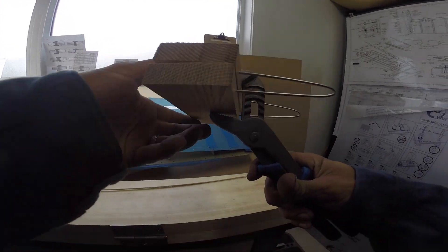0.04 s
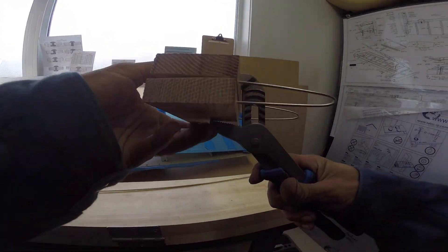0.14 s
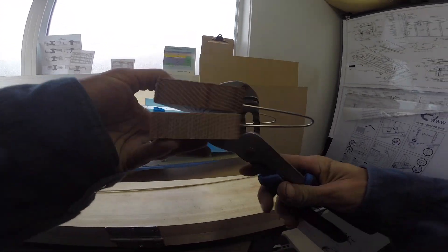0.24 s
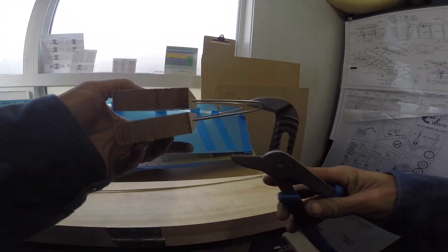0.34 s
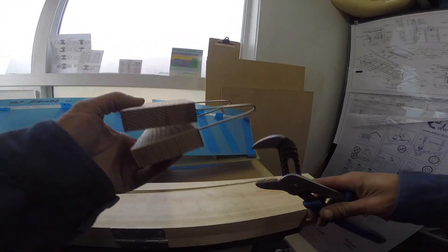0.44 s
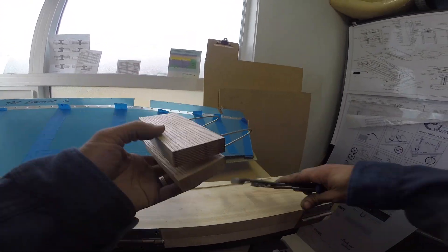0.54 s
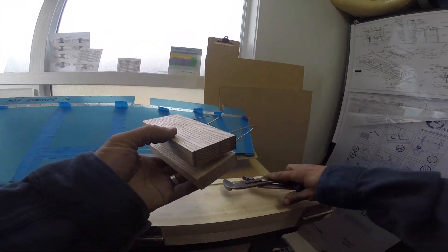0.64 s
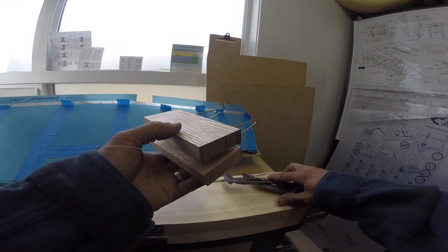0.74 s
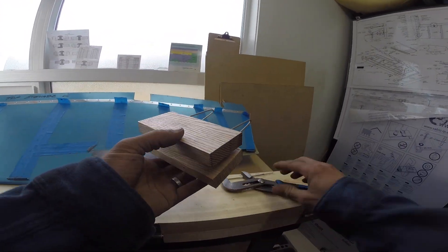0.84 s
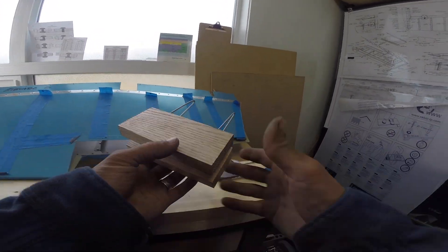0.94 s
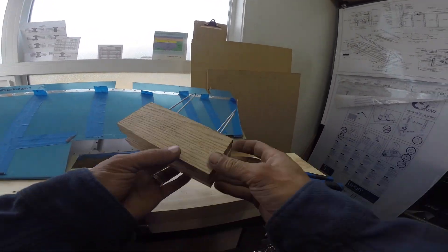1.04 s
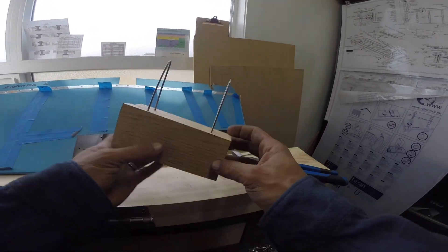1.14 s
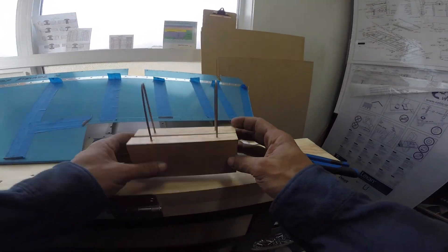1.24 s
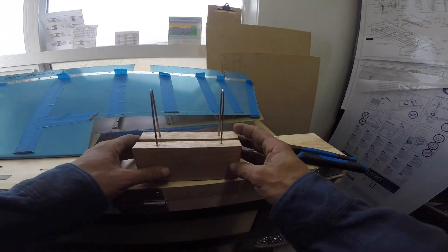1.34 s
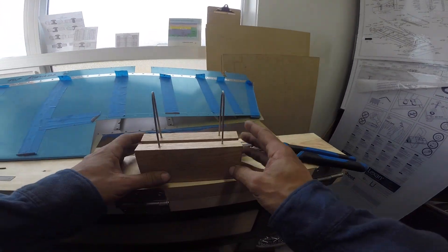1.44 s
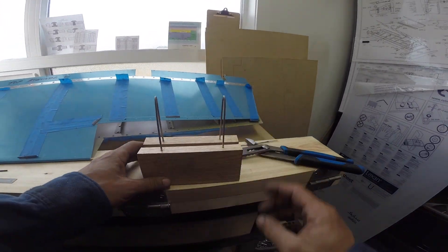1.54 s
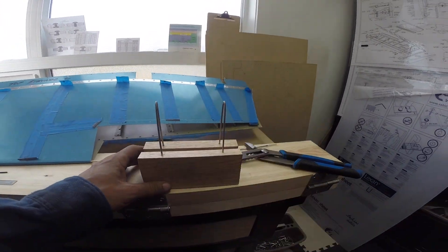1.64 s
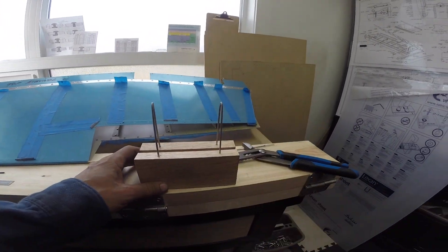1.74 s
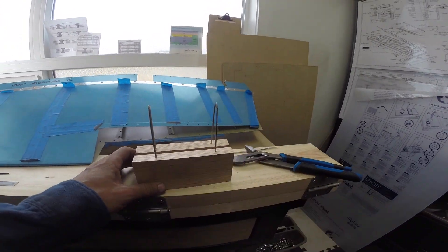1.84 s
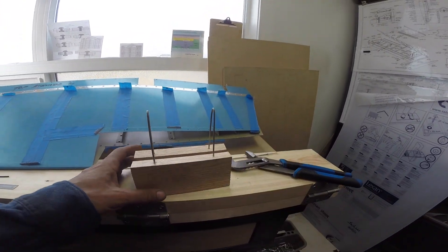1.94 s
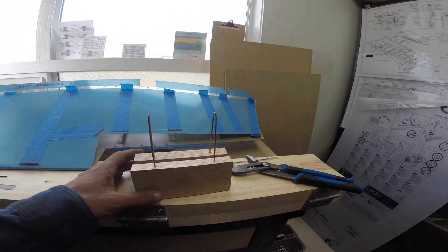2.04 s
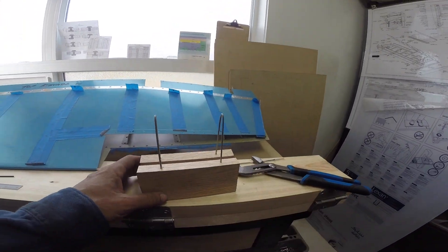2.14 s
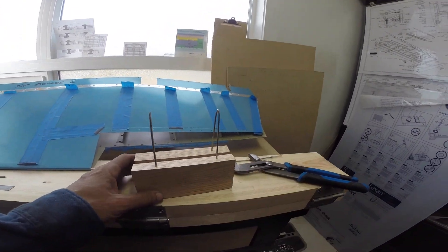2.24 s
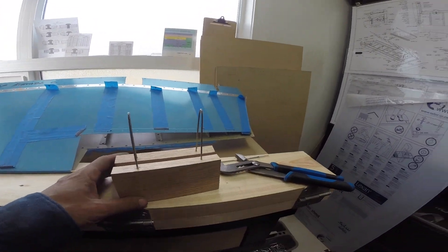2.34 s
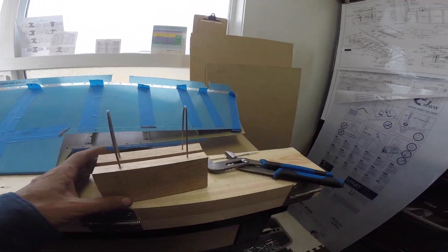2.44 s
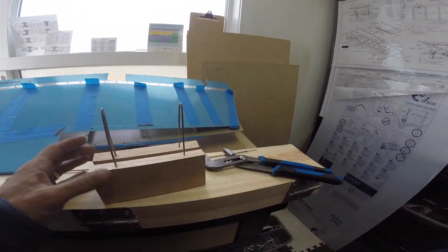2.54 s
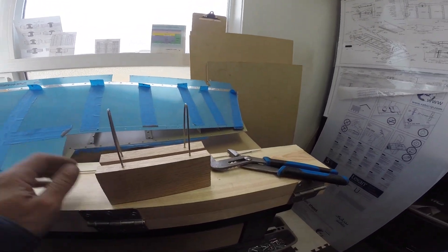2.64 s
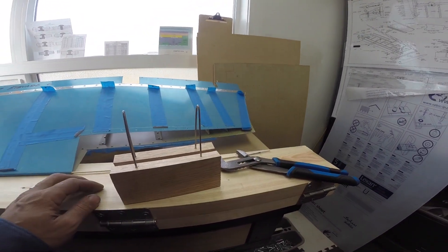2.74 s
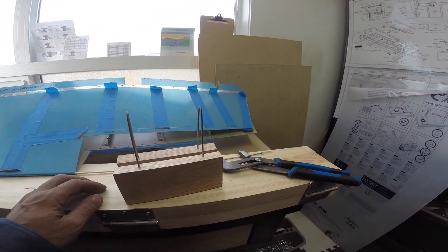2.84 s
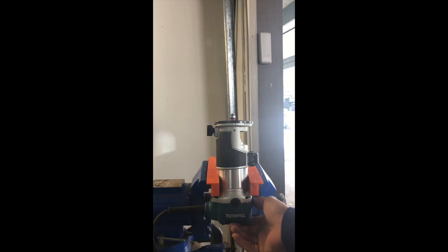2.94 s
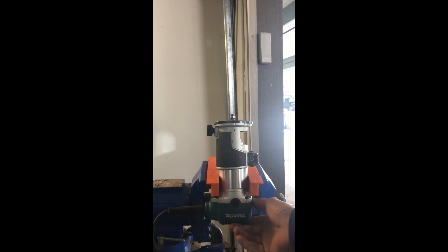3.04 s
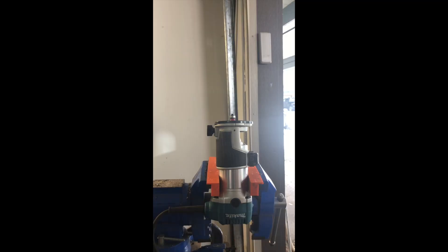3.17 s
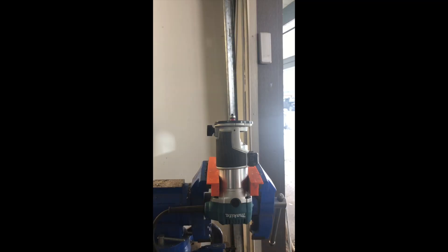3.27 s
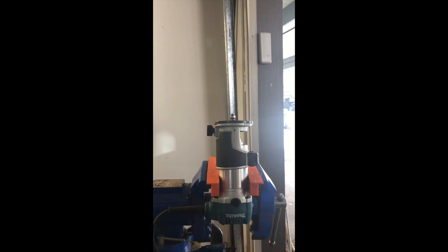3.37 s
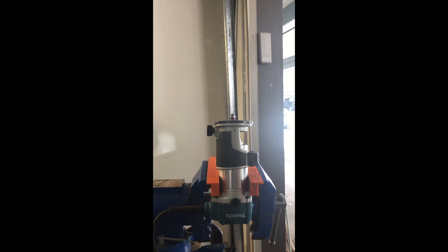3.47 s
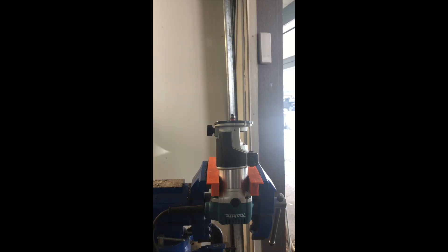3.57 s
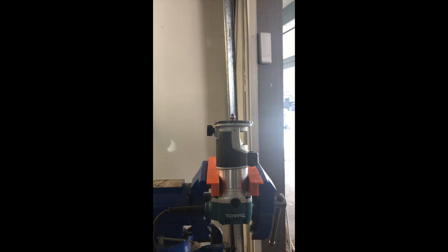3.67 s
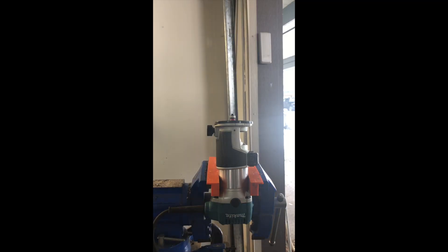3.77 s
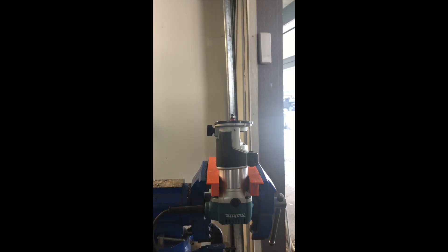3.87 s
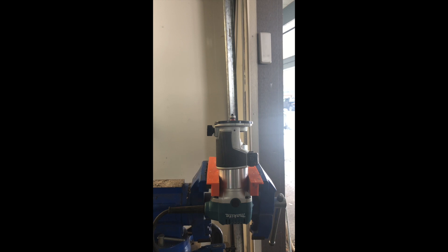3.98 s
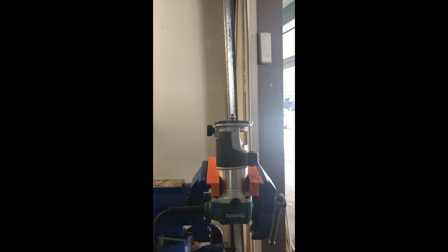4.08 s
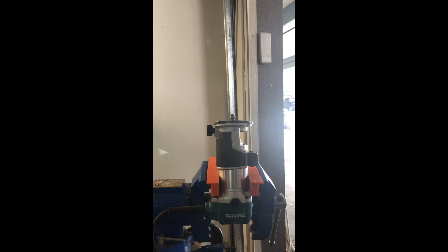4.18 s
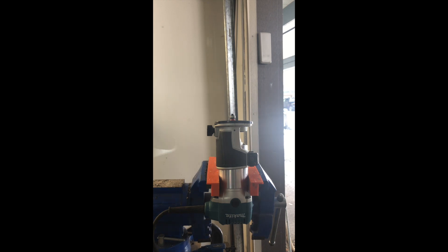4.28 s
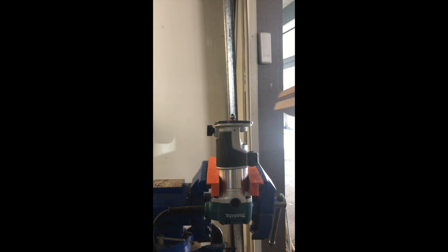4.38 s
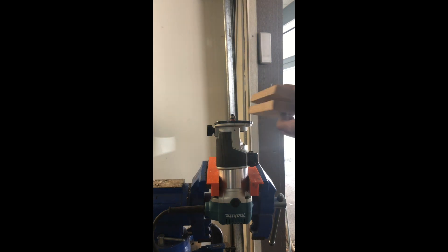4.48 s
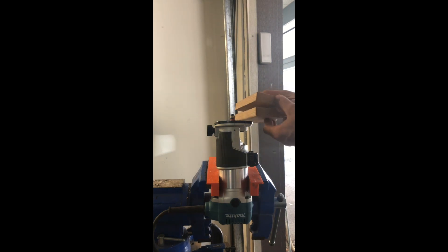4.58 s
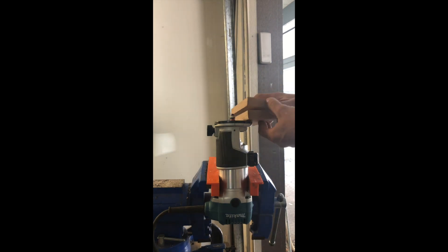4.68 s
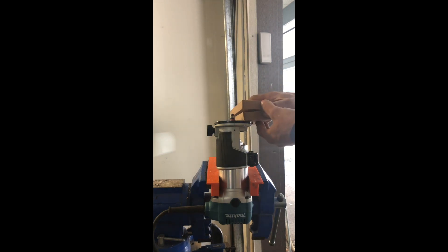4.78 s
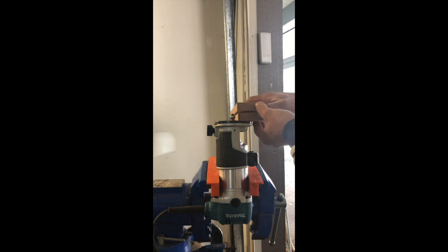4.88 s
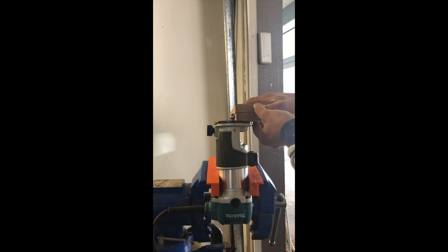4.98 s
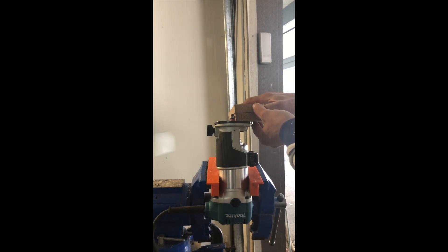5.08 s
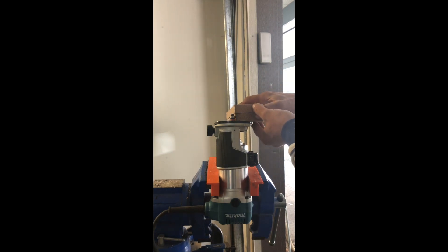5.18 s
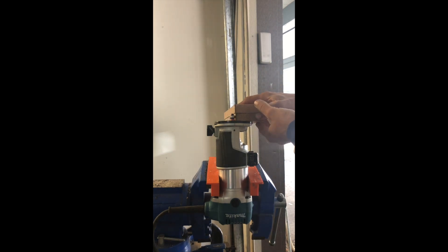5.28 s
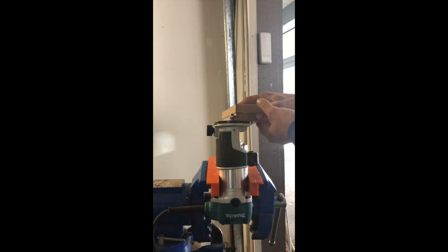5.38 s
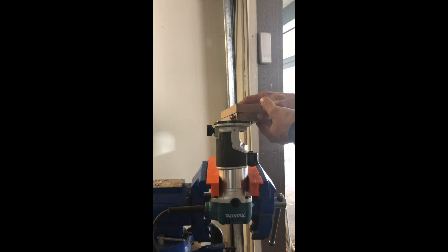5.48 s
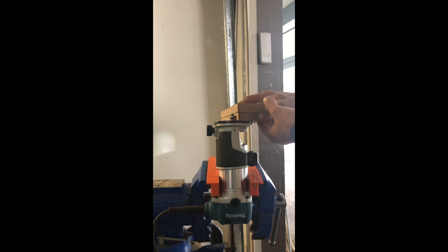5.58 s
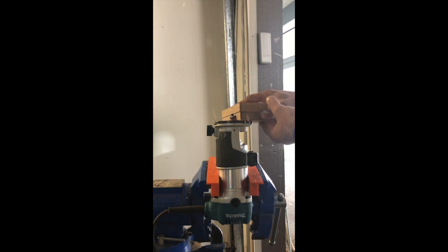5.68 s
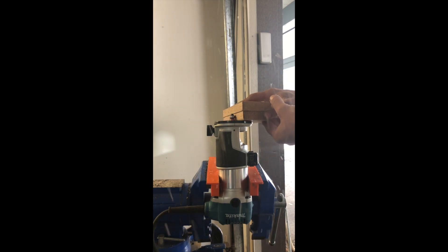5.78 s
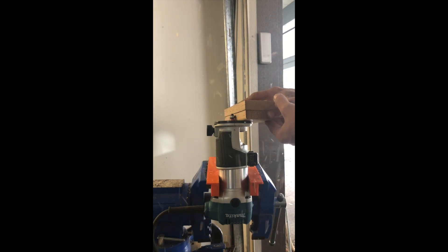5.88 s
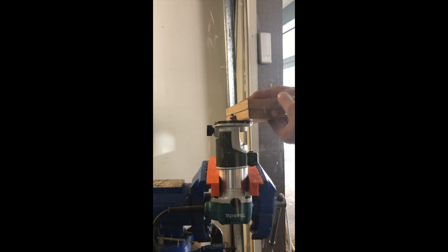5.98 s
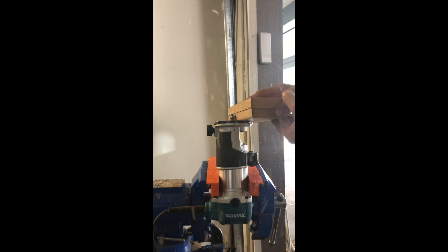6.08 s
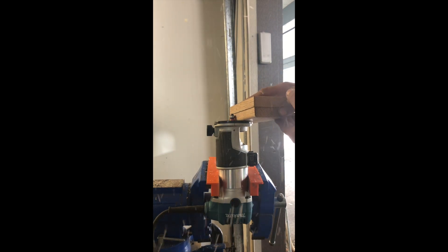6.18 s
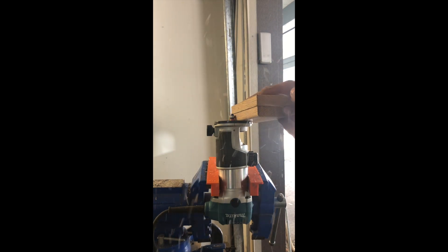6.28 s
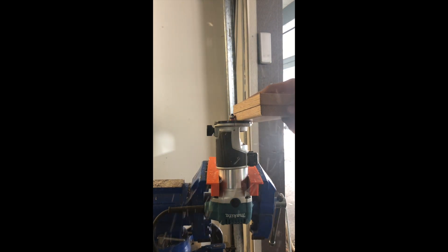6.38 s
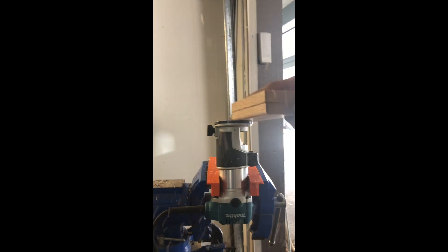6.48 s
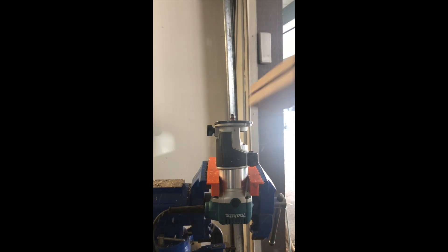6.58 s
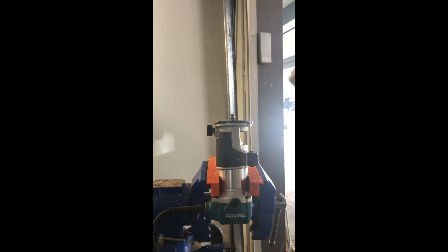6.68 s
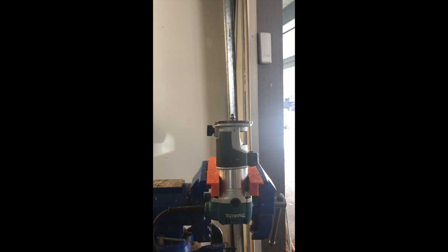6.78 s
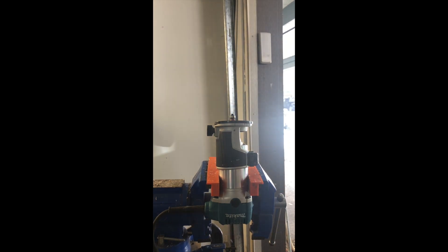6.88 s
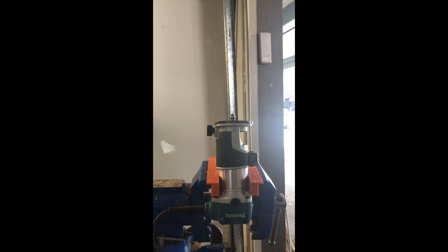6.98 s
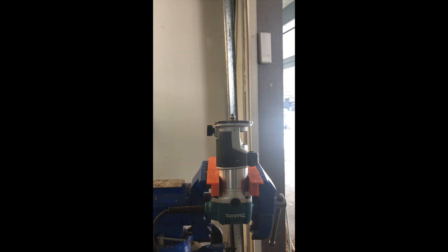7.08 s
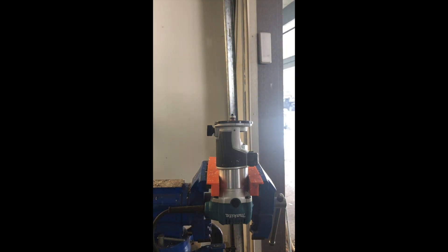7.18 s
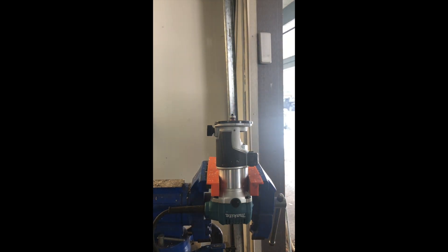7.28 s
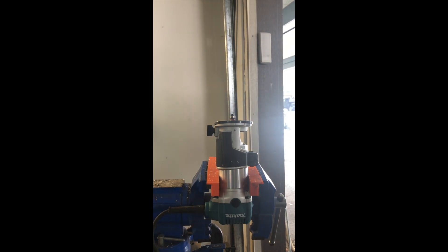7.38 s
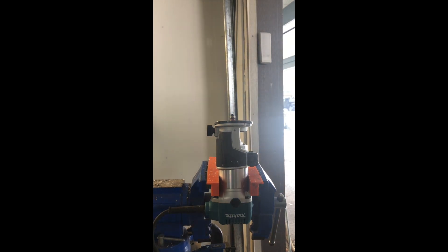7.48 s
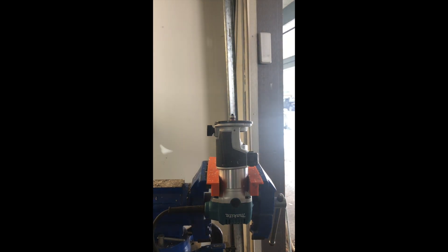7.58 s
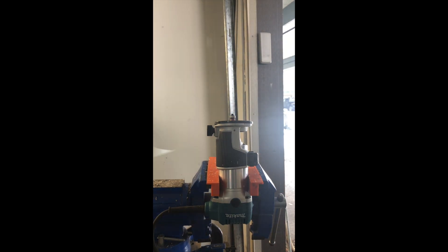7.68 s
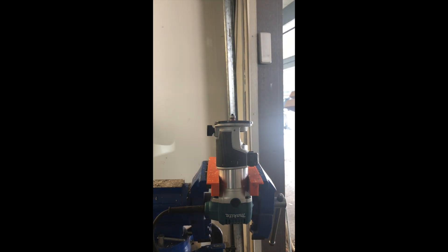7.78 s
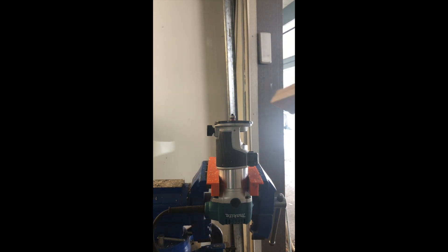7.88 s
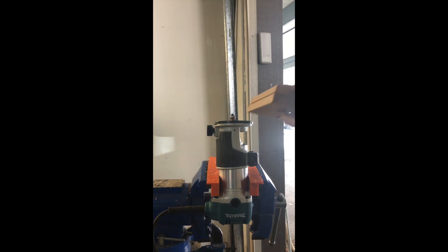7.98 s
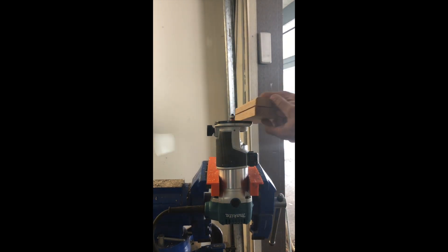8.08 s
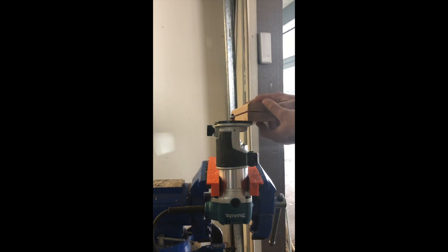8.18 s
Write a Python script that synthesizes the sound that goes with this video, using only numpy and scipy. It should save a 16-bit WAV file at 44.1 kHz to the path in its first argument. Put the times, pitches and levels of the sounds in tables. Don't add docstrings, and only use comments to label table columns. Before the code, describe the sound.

In a hushed workshop, sleeves rustle, plier jaws click brightly, and the tool clatters heavily onto a bench. A wooden block lands with a sharp knock, and its wires scrape faintly. An abrupt change brings a tiny switch click, then a small router spins up fast to a loud, steady whine with rushing fan air. Its tone is coloured slightly as wood is fed against it. Close, nearly mono, hurried sound.

```python
import sys
import numpy as np
from scipy import signal
from scipy.fft import rfft, irfft, next_fast_len
from scipy.io import wavfile
from scipy.ndimage import uniform_filter1d, map_coordinates

SR = 44100
rng = np.random.default_rng(int(sys.argv[2]) if len(sys.argv) > 2 else 0)


def generate_wav(signal):
    frames = np.transpose(np.atleast_2d(signal))
    scaled = np.clip(frames, -1, 1) * 32767
    pcm = np.round(scaled).astype(np.int16)
    wavfile.write(sys.argv[1], SR, pcm)


def magnitude_from_level(level_db):
    exponent = np.asarray(level_db, float) / 20
    return 10 ** exponent


N = 362502
T = np.arange(N) / SR
HZ = np.fft.rfftfreq(next_fast_len(N + N % 2, True), 1 / SR)

# (frequency [Hz], density [dB per Hz])
SHOP_HUSH = [(12, -38), (20, -12), (86, -5), (293, -9), (422, -11), (558, -13.5), (849, -15), (1400, -20),
             (2140, -23), (3160, -27), (16000, -46.5)]
# (time [s], spread [s], level [dB])
SLEEVES = [
    (0.0, 0.35, -59),
    (1.15, 0.45, -63),
    (2.11, 0.38, -65),
    (2.9, 0.4, -65.5),
]

# (time [s], peak level [dB], treble level [dB])
JAW_CLICKS = [
    (0.303, -42, -7),
    (0.3524, -40, -21),
    (0.358, -25.5, -10),
    (0.3662, -28, -17),
    (0.3714, -38, -7),
    (0.3854, -17.5, -30),
    (0.3875, -29, -8),
    (0.4184, -31, -16),
]
JAW_SNAP = [
    (0.5985, -46, 0),
    (0.616, -27.5, 1.5),
]
LAY_DOWN = [
    (0.768, -32, 10),
    (0.779, -27.5, -6),
    (0.834, -14, -0.5),
    (0.843, -15.5, -2),
    (0.86, -16, 9.5),
    (0.863, -9, -17),
    (0.874, -36, -20),
    (0.888, -13, -1.5),
    (0.897, -26, 3),
]
NUDGES = [
    (1.037, -46, -15),
    (1.91, -38, -15),
    (1.929, -39, -13),
    (1.949, -40, -18),
    (2.009, -38, -17),
    (2.756, -30, -3.5),
]
TOUCH = [
    (1.37, -29, -15),
    (1.371, -19, -13),
    (1.398, -24, -8),
]
SET_DOWN = [
    (1.396, -4.5, -19),
    (1.402, -13.5, -16),
]
SWITCH = [
    (3.067, -40.5, 7.5),
    (3.105, -50, -14),
]

# (frequency [Hz], level [dB], t60 [s])
JAWS = [(2830, -16, 0.2), (4270, -14, 0.056), (5000, -6.5, 0.048), (7760, 3, 0.056), (10550, 0.5, 0.052),
        (14800, 8, 0.089)]
HINGE = [(4300, 2.5, 0.051), (6600, 4.5, .07), (7200, -7, .06), (8700, 5, 0.068), (10940, -6, .07),
         (13430, -12, 0.071)]
BENCH = [(318, -2, 0.14), (668, 0, 0.1), (1030, -7.5, 0.068), (1390, -1, 0.057), (1980, -1, 0.062),
         (6440, -29, 0.044), (8540, -5.5, 0.055), (10740, 2, 0.088), (13200, -12, .04)]
BOARD = [(307, -12, 0.22), (672, -5, 0.15), (803, -6, 0.084), (2070, -10, 0.028), (3140, -11, 0.044),
         (9630, 1, 0.028), (12900, -10, 0.027)]
EDGE = [(690, 3, 0.063), (833, -5, 0.082), (1350, -7, 0.028), (7540, 8, 0.038)]
BLOCK = [(787, -5.5, 0.11), (1060, -19, 0.054), (1404, -1, 0.074), (1667, -1.5, 0.065), (1960, -14, 0.054),
         (2380, 2, 0.027), (2820, 3, 0.033), (3180, 9, 0.018), (8160, -15, .1)]
LEVER = [(1720, -5, 0.023), (2410, -13, .03), (7200, -8, 0.018), (9900, -9, 0.018)]

# (start [s], end [s], level [dB])
WIRES = [
    (1.198, 1.24, -61.5),
    (1.878, 1.95, -51.5),
    (2.207, 2.24, -75),
    (2.272, 2.32, -67),
]
# (frequency [Hz], t60 [s])
WALLS = [(400, 0.34), (1000, 0.23), (2200, 0.16), (4500, 0.089), (9000, 0.18)]

# (frequency [Hz], density [dB per Hz])
CORNER_HUSH = [(35, -44), (60, -49), (113, -11), (822, -11), (946, -9.5), (2410, -18), (16000, -35)]
# (time [s], shaft speed [Hz])
SPEED = [(3.11, 22.4), (3.15, 91.6), (3.19, 177.3), (3.225, 276.5), (3.265, 408.9), (3.3, 532.1),
         (3.32, 609.1), (3.37, 769.7), (3.4, 865.0), (3.43, 937.6), (3.46, 989.6), (3.49, 1025.1),
         (3.52, 1024.9), (3.59, 993.1), (3.64, 992.3), (3.7, 995.8), (8.21, 995.7)]
# (time [s], extra path [ms], share [0-1])
MIRROR = [(3.7, 0.77, 0.07), (4.12, 0.74, 0.12), (4.27, 0.53, .33), (4.37, 0.45, .36), (4.48, 0.36, 0.28),
          (4.66, .31, .12), (4.9, .25, 0.2), (5.6, .262, 0.2), (6.0, 0.22, 0.18), (6.45, 0.21, 0.24),
          (6.61, 0.15, 0.32), (6.76, 0.3, 0.14), (6.98, 0.49, 0.17), (7.19, 0.73, 0.2), (7.43, 0.71, 0.14),
          (7.78, 0.47, 0.17), (8.03, 0.37, 0.23), (8.22, 0.33, 0.14)]
# (frequency [Hz], width [Hz], rms of a line at full speed [dB])
CASING = [(484, 71, -15.5), (848, 91, -24.5), (989.2, 18, -27), (1680, 130, -22), (2190, 275, -12.5),
          (3750, 61, -28), (4070, 86, -30.5), (6544, 650, -43), (7730, 1000, -31.5), (9960, 1300, -33.5),
          (11800, 2300, -38.5)]
BEARING_SIDES = (2.087, 5.087, 6.087, 15.34)
SLOT_SIDES = (3, 7, 13)
BIT_SIDES = (3, 5, 6, 7, 9, 10, 11, 13, 14, 15)
BEARING_UNDER_DB = [-19, -17, -17, -24]
SLOT_UNDER_DB = [-11.5, -8, -10]
BIT_UNDER_DB = [-22, -10.5, -21, -25, -36, -32, -19, -24, -27, -21]
# (frequency [Hz], level at switch-on [dB], level when running [dB])
MAINS = [(239, -56, -68), (482, -43.5, -58.5), (723, -48, -63), (990, -57, -75)]
# (frequency [Hz], density [dB per Hz])
AIR = [(60, -39), (250, -40), (600, -27), (950, -19), (1400, -13), (2000, -10), (3000, -15.5), (4200, -8.5),
       (6000, -16), (8000, -13.5), (11500, -12), (15500, -19.5)]
# (frequency [Hz], width [Hz], level [dB])
HOUSING = [(1810, 75, 3.5), (2250, 38, 11), (2663, 79, 5), (2998, 43, 9.5), (3315, 260, 4), (4660, 710, -6),
           (5960, 1500, 4.5), (7340, 1700, 4.5), (8500, 300, -6.5), (13140, 2200, 1), (14700, 1690, 5)]
NEAR_S = (4.31, 4.91, 6.61, 7.11, 7.6, 8.2)
PUFF_S = (7.67, 7.71, 7.79)

CUT_S, RESUME_S, POWER_S = 2.982, 2.992, 3.104
RUN_HZ, SAG_HZ = 995.7, 1.3
BEARING, BARS = 4.087, 24.5
LINE_POWER, SLOT_POWER, BLADE_POWER, AIR_POWER = 2.02, 1.4, 1.83, 2.22
DIG_S, OUT_S = 5.13, 6.49
TOP_HZ = 15850


def level(x, db):
    return x * magnitude_from_level(db) / np.sqrt(np.mean(x ** 2))


def shape_db(points, hz):
    f, db = np.transpose(points)
    return np.interp(np.log(hz + 1), np.log(f), db)


def tinted(x, gain):
    return irfft(rfft(x, 2 * len(HZ) - 2) * gain)[:N]


def noise(db):
    return level(tinted(rng.standard_normal(2 * len(HZ) - 2), magnitude_from_level(db)), 0)


def bump(hz, centre_hz, width_hz):
    return 1 / (1 + (2 * (hz - centre_hz) / width_hz) ** 2)


def walk(rate):
    k = int(SR / rate)
    steps = np.repeat(rng.standard_normal(N // k + 1), k)
    return 1.35 * uniform_filter1d(uniform_filter1d(steps, k), k)[:N]


def curves(table):
    s, *columns = np.transpose(table)
    return [np.interp(T, s, c) for c in columns]


def knocks(blows, modes, split_hz, crack_db, crack_t60, dull_hz, rough):
    out, t = np.zeros(N), T[:SR // 4]
    low = signal.butter(1, min(split_hz, 15000), fs=SR)
    high = signal.butter(2, min(dull_hz, 15000), "high", fs=SR)
    for s, peak_db, treble_db in blows:
        ring = np.zeros(len(t))
        for f, db, t60 in modes:
            sine = magnitude_from_level(db + 2 * rng.standard_normal()) * np.sin(2 * np.pi * (f * t + rng.random()))
            waver = 1 + rough * uniform_filter1d(rng.standard_normal(len(t)), size=64) * 8
            ring += sine * 1000 ** (-t / t60) * waver
        crack = signal.lfilter(*high, rng.standard_normal(len(t))) * 1000 ** (-t / crack_t60)
        ring = (ring + magnitude_from_level(crack_db) * crack) * (1 - np.exp(-t / 0.0001))
        bass = signal.lfilter(*low, ring)
        treble = (ring - bass) * (0.65 + 0.37 * np.exp(-t / 0.0066))
        bass = signal.lfilter(*low, bass)
        both = bass / np.abs(bass).max() + magnitude_from_level(treble_db) * treble / np.abs(treble).max()
        i = int(s * SR)
        out[i:i + len(t)] += magnitude_from_level(peak_db) * both
    return out


def shop_hush():
    return noise(shape_db(SHOP_HUSH, HZ)) * magnitude_from_level(-52.5 + 1.0 * walk(3.3))


def sleeves():
    swell = magnitude_from_level(-74.5)
    for s, spread, db in SLEEVES:
        swell = swell + magnitude_from_level(db) * np.exp(-((T - s) / spread) ** 2)
    return noise(10 * np.log10(bump(HZ, 3900, 6000))) * magnitude_from_level(0.94 * walk(5.6)) * swell


def pliers():
    out = knocks(JAW_CLICKS, JAWS, 12300, 2.4, 0.048, 2400, 1.0)
    out += knocks(JAW_SNAP, HINGE, 6000, 2, 0.043, 3000, 1.6)
    return out + knocks(LAY_DOWN, BENCH, 2200, 10.3, 0.093, 500, 0.32)


def block():
    out = knocks(NUDGES, BOARD, 5000, -0.94, 0.064, 500, 0.66)
    out += knocks(TOUCH, EDGE, 3500, -7, .04, 900, 0.19)
    return out + knocks(SET_DOWN, BLOCK, 3600, 6.3, 0.026, 890, 0.57)


def wires():
    bands = bump(HZ, 7750, 700) + 1.3 * bump(HZ, 10700, 1300) + 0.21 * bump(HZ, 13800, 1500)
    chatter = noise(20 * np.log10(bands))
    slide = np.zeros(N)
    for a, b, db in WIRES:
        slide += magnitude_from_level(db) * np.interp(T, [a - .008, a, b, b + .015], [0.032, 0.95, 0.44, 0.014])
    return chatter * slide * magnitude_from_level(2.3 * walk(120))


def walls(x):
    t = T[:SR // 3]
    tail = np.zeros(len(t))
    for hz, t60 in WALLS:
        band = signal.butter(1, [hz / 1.03, hz * 1.3], "band", fs=SR)
        tail += signal.lfilter(*band, rng.standard_normal(len(t))) * 1000 ** (-t / t60)
    tail *= 1 - np.exp(-t / 0.0023)
    return x + magnitude_from_level(-13) * signal.fftconvolve(x, tail / np.sqrt(np.sum(tail ** 2)))[:N]


def bench():
    blows = .45 * np.tanh(walls(pliers() + block()) / .45)
    return (shop_hush() + sleeves() + blows + wires()) * (T < CUT_S)


def corner_hush():
    return noise(shape_db(CORNER_HUSH, HZ)) * magnitude_from_level(-63.5)


def switch():
    return knocks(SWITCH, LEVER, 4300, 0, 0.022, 1500, 0.71)


def near():
    return np.interp(T, NEAR_S, [0.032, 1, 1, 0.038, 0, 0.85])


def bite():
    dig_in_s, run_out_s = .1, 0.056
    dig = np.clip(T - DIG_S, 0, None) / dig_in_s
    return (1 - (1 + dig) * np.exp(-dig)) * np.clip((OUT_S + run_out_s - T) / run_out_s, 0, 1)


def cover():
    clear_s = 0.38
    return np.interp(T, [DIG_S, OUT_S, OUT_S + clear_s], [0, 1, 0]) ** 1.63


def windings(shaft_hz):
    out = np.zeros(N)
    for hz, start_db, run_db in MAINS:
        db = np.interp(shaft_hz, [450, 900], [start_db, run_db]) + 1.4 * walk(14)
        out += np.sqrt(2) * magnitude_from_level(db) * np.sin(2 * np.pi * hz * T)
    return out


def brushes(shaft_hz):
    bands = bump(HZ, 2130, 490) + 1.0 * bump(HZ, 1590, 300)
    bands += 0.5 * bump(HZ, 4200, 400) + 0.55 * bump(HZ, 6950, 400)
    return noise(20 * np.log10(bands)) * magnitude_from_level(np.interp(shaft_hz, [20, 200, 400, 900], [-50.0, -44, -39, -39.5]))


def motor():
    shaft_hz = curves(SPEED)[0] - SAG_HZ * bite()
    late_ms, share = curves(MIRROR)
    close, covered, cut = near(), cover(), bite()

    def heard_db(order, mirror, wander_db, power=LINE_POWER):
        hz = order * shaft_hz
        casing = magnitude_from_level(-40) + sum(magnitude_from_level(db) * bump(hz, f, w) for f, w, db in CASING)
        echo = np.abs(1 + np.minimum(mirror * share, .85) * np.exp(2j * np.pi * hz * late_ms / 1000))
        return 20 * np.log10(casing * echo * (shaft_hz / RUN_HZ) ** power) + wander_db * walk(4.096)

    unbalance_db = heard_db(order=1, mirror=.15, wander_db=0.7) - 4.5 * cut * (1 - covered) - 2.4 * close
    bearing_db = heard_db(order=BEARING, mirror=1.64, wander_db=0.16) - 12 * covered
    fourth_db = heard_db(order=4, mirror=1.6, wander_db=1.1) - 6 + 5 * close - 3.4 * covered
    slots_db = heard_db(order=8, mirror=0.27, wander_db=1.0, power=SLOT_POWER) - 6.5
    blades_db = heard_db(order=12, mirror=0.21, wander_db=.7, power=BLADE_POWER) + 2.5
    blades_db += -4.5 * close - 7.0 * covered
    blades_db += 13 * bump(12 * shaft_hz, 6500, 1400)
    idle_bit_db = heard_db(order=2, mirror=.1, wander_db=0.0) - 18.5 - 6.8 * close
    bit_db = 20 * np.log10(magnitude_from_level(idle_bit_db) + magnitude_from_level(-21.5) * cut)
    bars_db = -43 + 9 * bump(BARS * shaft_hz, 6700, 1500) - np.interp(shaft_hz, [150, 300, 500], [25, 6, 0])

    turns = np.cumsum(shaft_hz + 0.14 * walk(15)) / SR
    turns += np.interp(shaft_hz, [600, 985], [.018, 0]) * walk(350)

    def line(order, db, flutter_db):
        sine = np.sqrt(2) * np.sin(2 * np.pi * (order * turns + rng.random()))
        return sine * magnitude_from_level(db + flutter_db * walk(40)) * (order * shaft_hz < TOP_HZ)

    def sides(orders, unders, db):
        return sum(line(k, db + under_db, 1.2) for k, under_db in zip(orders, unders))

    out = line(1, unbalance_db, flutter_db=0.67) + line(2, bit_db, flutter_db=-0.26)
    out += line(4, fourth_db, flutter_db=2.0) + line(BEARING, bearing_db, flutter_db=1.03)
    out += line(8, slots_db, flutter_db=3.2) + line(12, blades_db, flutter_db=2.3)
    out += line(BARS, bars_db, flutter_db=3.0)
    out += sides(BEARING_SIDES, BEARING_UNDER_DB, bearing_db)
    out += sides(BIT_SIDES, BIT_UNDER_DB, bit_db - 5.0 * (1 - cut))
    out += sides(SLOT_SIDES, SLOT_UNDER_DB, slots_db - 15 * (shaft_hz < 800))
    return out + windings(shaft_hz) + brushes(shaft_hz)


def fan():
    speed = np.clip(curves(SPEED)[0] / RUN_HZ, .15, None)
    late_ms, share = curves(MIRROR)
    mid_db = 5.4 * (1 - speed) + .6 * near() - 1.7 * cover()
    upper_db = 1.1 * (1 - speed) - .8 * near() - 2.4 * bite() * (1 - cover())
    colour_db = shape_db(AIR, HZ) + sum(db * bump(HZ, f, w) for f, w, db in HOUSING)
    band = (HZ > 13500) & (HZ < 15500)
    power = magnitude_from_level(2 * colour_db)
    air = noise(colour_db) * np.sqrt(np.sum(power) / np.sum(power[band]))
    mid = tinted(air, bump(HZ, 3000, 4100))
    upper = tinted(air, bump(HZ, 9500, 6900))
    air = air + (magnitude_from_level(mid_db) - 1) * mid + (magnitude_from_level(upper_db) - 1) * upper
    air = air * magnitude_from_level(-31.5 + 0.93 * near() + 0.78 * walk(5)) * speed ** AIR_POWER
    dull = tinted(air, bump(HZ, 3300, 4600))
    return air + 1.66 * share * map_coordinates(dull, [np.arange(N) - late_ms * SR / 1000], order=1)


def router():
    return (motor() + fan()) * np.clip((T - POWER_S) / 0.013, 0, 1)


def draught():
    return noise(10 * np.log10(bump(HZ, 120, 60) ** 2)) * np.interp(T, PUFF_S, [.6, 1, .5], 0, 0) * magnitude_from_level(-56)


def corner():
    heard = (corner_hush() + switch() + draught()) * (T > RESUME_S) + router()
    return signal.sosfilt(signal.butter(3, 90, "high", fs=SR, output="sos"), heard)


def scene():
    return np.tile(bench() + corner(), (2, 1))


def side_grains(x, count=34):
    side, frame = np.zeros(N), np.hanning(2048)
    for when, pitch in rng.random((count, 2)):
        i, hz = int((3.55 + 4.55 * when) * SR), 4500 * 3.2 ** pitch
        band = signal.butter(4, [hz * 0.97, hz * 1.05], "band", fs=SR, output="sos")
        loud = np.std(signal.sosfilt(band, x[i:i + 2048]))
        hiss = signal.sosfilt(band, rng.standard_normal(2048))
        side[i:i + 2048] += .9 * loud * frame * hiss / np.std(hiss)
    return np.array([side, -side])


def low_pass(x):
    return signal.sosfilt(signal.butter(12, 17060, fs=SR, output="sos"), x)


def record(dry):
    cut = signal.sosfilt(signal.ellip(12, .2, 70, TOP_HZ, fs=SR, output="sos"), dry)
    mix = cut + side_grains(cut[0])
    return low_pass(mix)


dry = scene()
out = record(dry)
generate_wav(out)
```